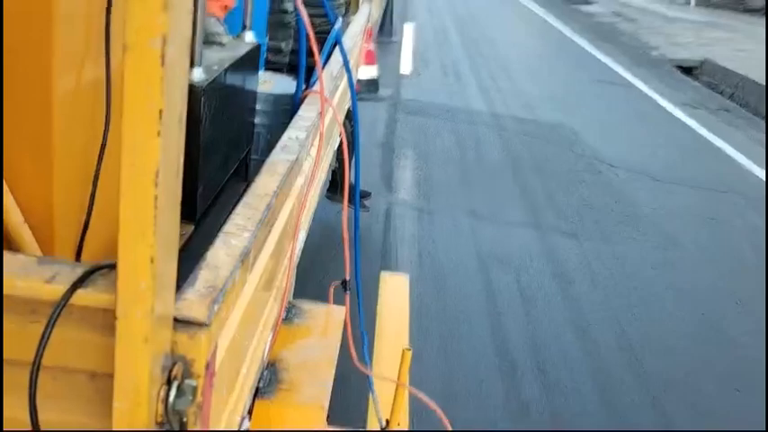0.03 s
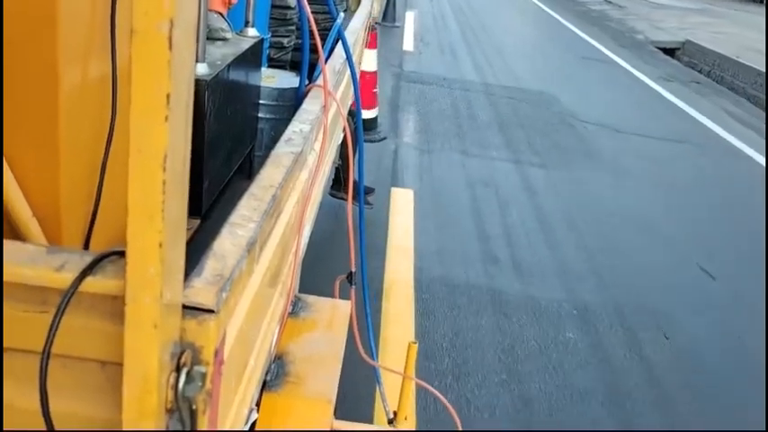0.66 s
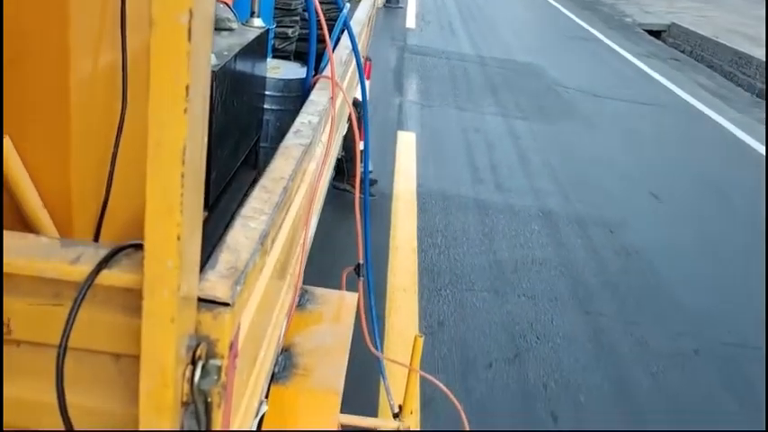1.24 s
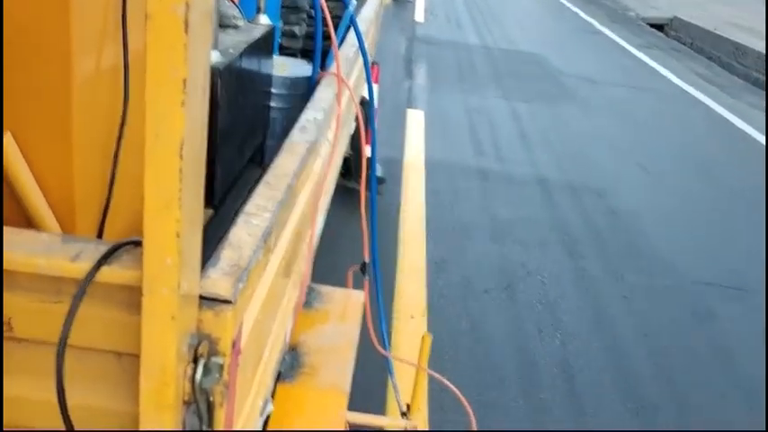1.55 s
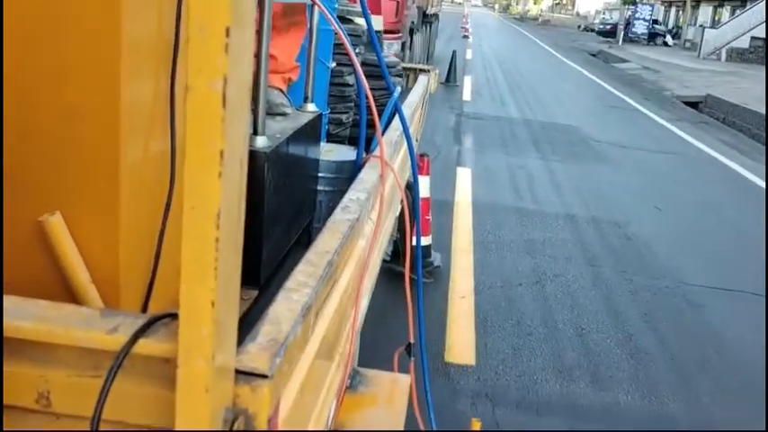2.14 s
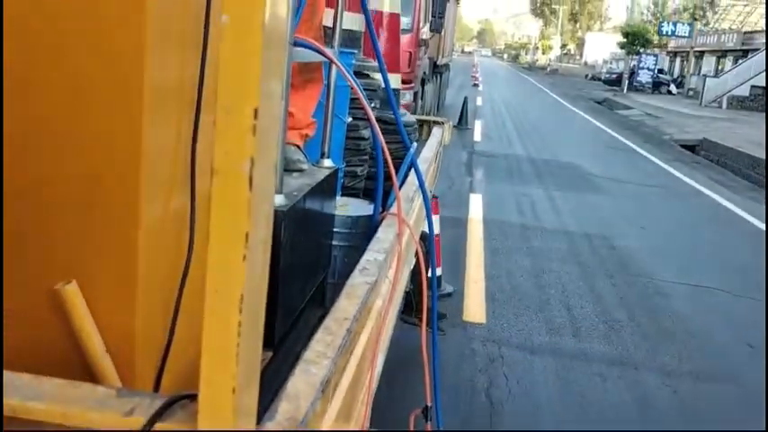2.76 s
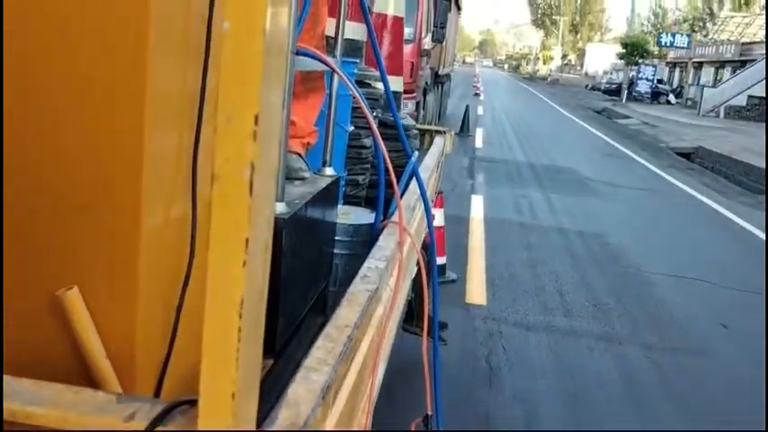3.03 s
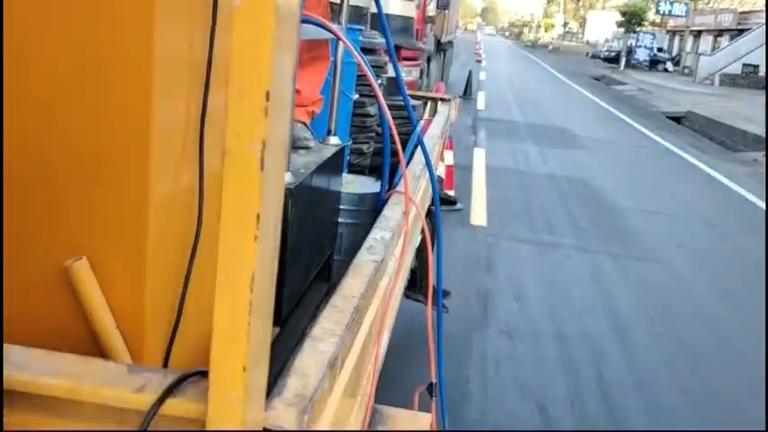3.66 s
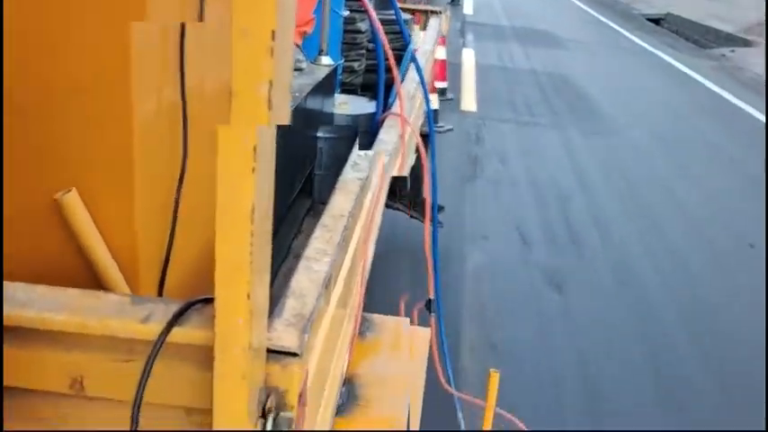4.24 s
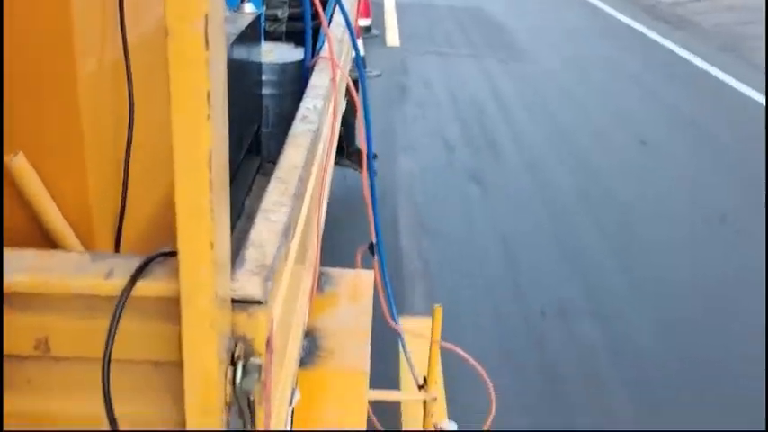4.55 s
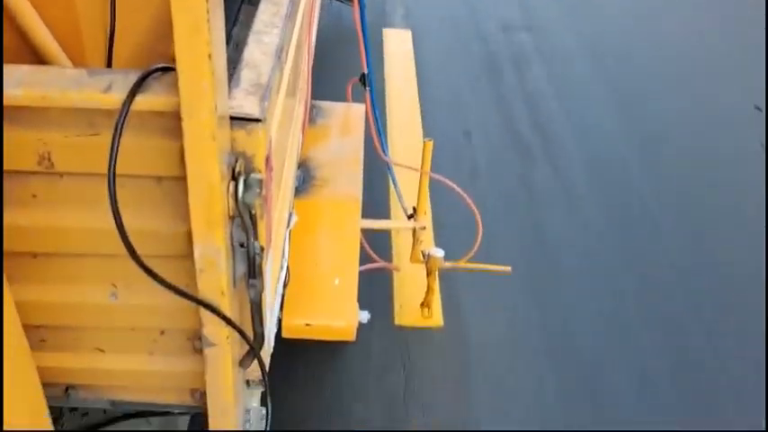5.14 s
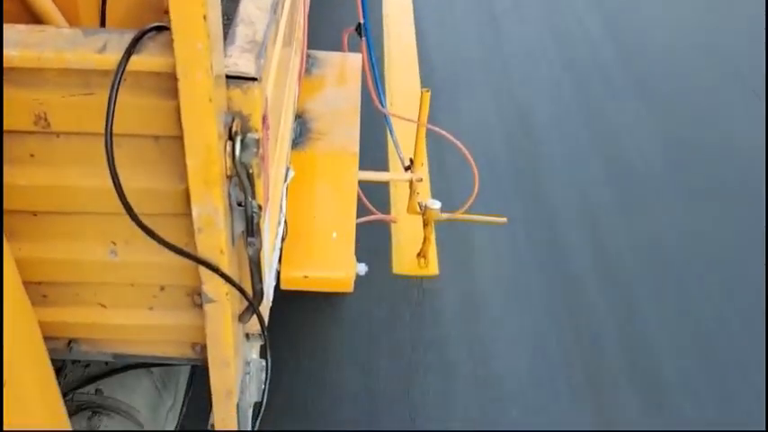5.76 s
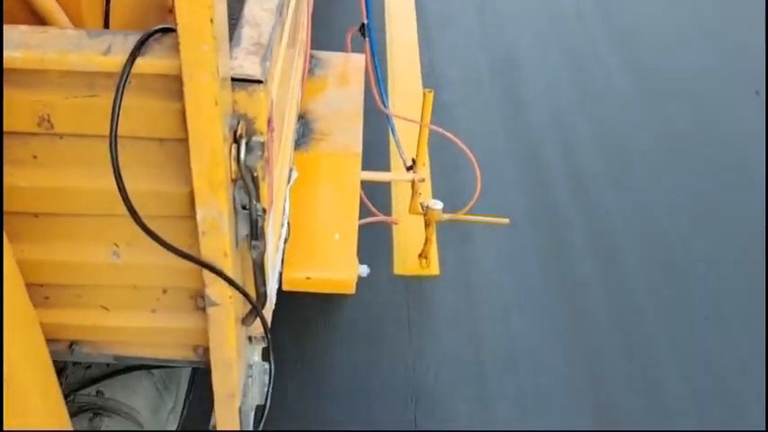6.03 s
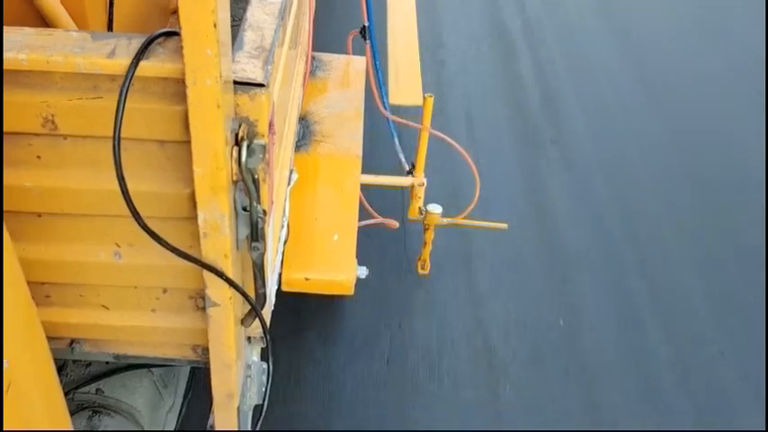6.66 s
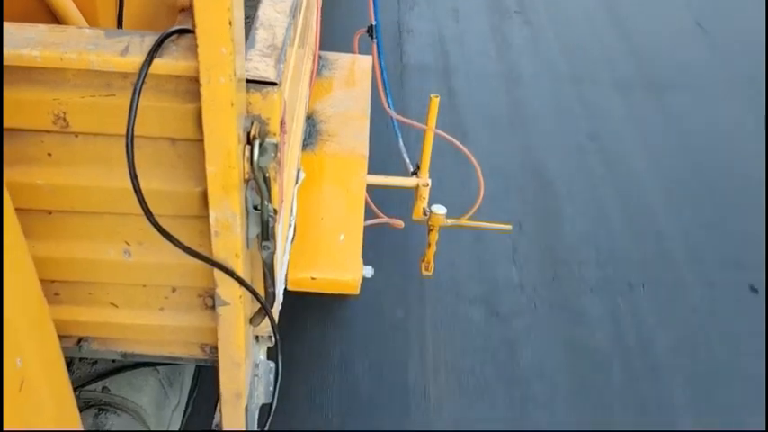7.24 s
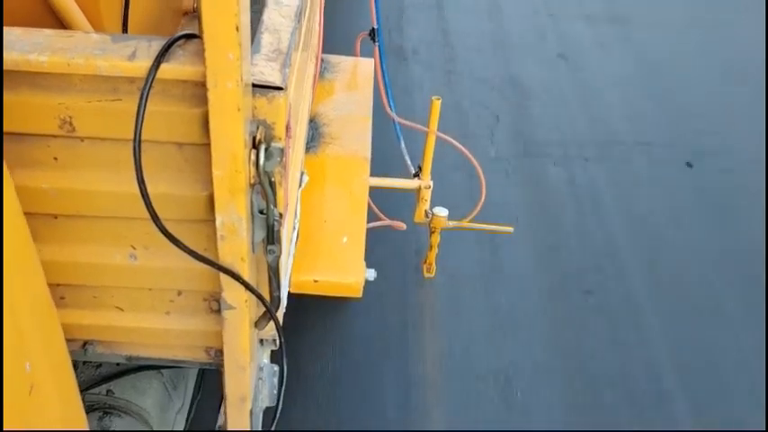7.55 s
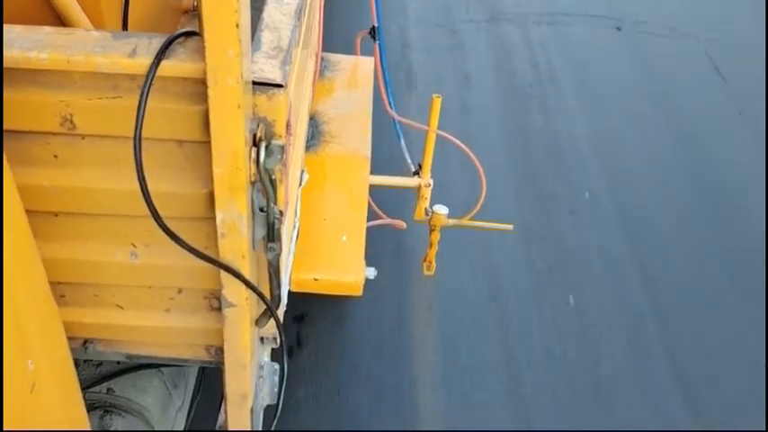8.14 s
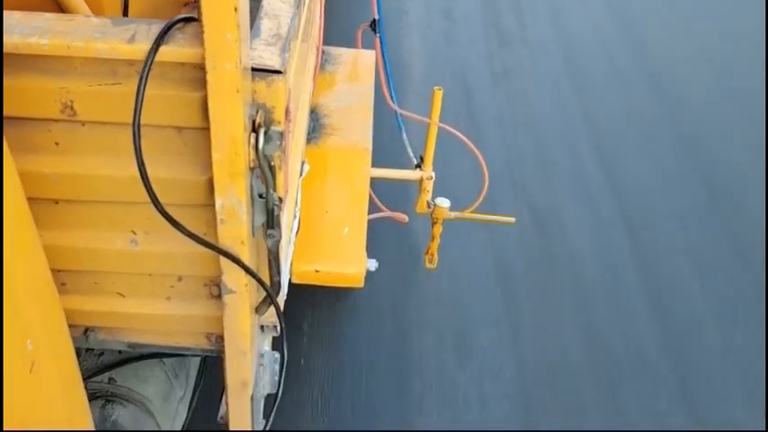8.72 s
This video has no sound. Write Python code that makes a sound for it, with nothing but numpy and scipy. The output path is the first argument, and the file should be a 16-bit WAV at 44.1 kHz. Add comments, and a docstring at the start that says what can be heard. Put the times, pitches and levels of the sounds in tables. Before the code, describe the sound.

Heard from aboard a slow truck painting lines on a road, a compressor's diesel engine chugs close by amid rumbling and rattling panels. A paint nozzle gives a short, sharp hiss, then a thin leak of air remains. With a tiny squeak the nozzle opens for a longer hiss that turns brighter before it cuts off. Occasional thumps shake the deck, and a third hiss starts near the end.

```python
"""A small diesel throbs on the deck of a creeping road-marking truck, driving its compressor.
Each firing sends a puff through the exhaust pipe and silencer, and the valves tick on the metal head,
over the truck's hum, rumble, clatter and jolts. The spray gun's turbulent jet hisses three times, its
paint valve squeaking once; at the end of a stripe the paint stops first and the bare air blows
brighter for a moment. Between stripes a little air keeps leaking."""
import sys
import numpy as np
from scipy import signal
from scipy.fft import rfft, irfft, next_fast_len
from scipy.io import wavfile
from scipy.ndimage import uniform_filter1d

SR = 44100
rng = np.random.default_rng(int(sys.argv[2]) if len(sys.argv) > 2 else 0)


def pcm_store(signal):
    """Save signal as 16-bit PCM."""
    levels = np.round(np.clip(np.atleast_2d(signal), -1, 1) * 32767)
    wavfile.write(sys.argv[1], SR, levels.astype(np.int16).T)


N = 396459
TIME = np.arange(N) / SR


def gain_of(db):
    """Decibels to amplitude ratio."""
    return 10 ** (np.asarray(db) / 20)


def unit_rms(x):
    """Normalisation to unit power."""
    return x / np.sqrt(np.mean(x ** 2) + 1e-20)


def spectrum_at(points, hz):
    """Interpolation of a spectrum on a log-frequency axis."""
    f, value = np.transpose(points)
    return np.interp(np.log(hz + 1), np.log(f + 1), value)


def follow(rows, t=TIME):
    """Linear interpolation of each column of a curve at the times t."""
    times, *columns = np.transpose(rows)
    return [np.interp(t, times, column) for column in columns]


def wander(hz, hop=64):
    """Random modulation: noise of unit rms, low-passed at about hz."""
    steps = next_fast_len(N // hop + 2)
    f = np.fft.rfftfreq(steps, hop / SR)
    slow = irfft(rfft(rng.standard_normal(steps)) / (1 + (f / hz) ** 4), steps)
    return unit_rms(np.interp(TIME, np.arange(steps) * hop / SR, slow))


def resonance_db(peaks, hz):
    """Gain of a set of Lorentzian peaks and dips."""
    return sum(db / (1 + (2 * (hz - centre) / width) ** 2) for centre, width, db in peaks)


def resonate(x, spectrum, peaks=(), size=16384):
    """Forced response of a minimum-phase body to x, scaled to unit rms."""
    hz = abs(np.fft.fftfreq(size, 1 / SR))
    log_gain = np.log(gain_of(spectrum_at(spectrum, hz) + resonance_db(peaks, hz)))
    impulse_response = np.fft.ifft(np.exp(np.conj(signal.hilbert(log_gain)))).real[:size // 2]
    return unit_rms(signal.oaconvolve(x, impulse_response)[:N])


def grains(per_s, spread_db):
    """Shot noise: sparse clicks of uneven size."""
    size = gain_of(spread_db * np.minimum(rng.exponential(1, N), 4))
    return unit_rms(size * rng.standard_normal(N) * (rng.random(N) < per_s / SR))


def pulse(cycles, decay):
    """Exponential decay, restarted each cycle; decay is a share of the cycle."""
    return unit_rms(np.exp(-(cycles % 1) / decay))


def near_wheel():
    """Proximity: the listener leans out from the deck toward the rear wheel and back."""
    # listening position: (time [s], nearness [0-1])
    lean = [(1.8, 0.25), (3.2, 0.81), (4.2, 0.63), (4.7, 1), (6.8, 0.96), (8.2, 0.67)]
    return np.clip(follow(lean)[0], 0, 1)


def firing_cycles(first=.436):
    """Engine phase in cycles: a four-stroke cylinder fires once in two revolutions."""
    # compressor engine: (time [s], speed [rpm])
    speed = [(0.0, 1842), (0.6, 1833), (1.3, 1872), (1.8, 1837), (2.6, 1840), (3.5, 1824), (4.2, 1848),
             (4.7, 1838), (6.3, 1837), (7.3, 1833), (9.0, 1848)]
    rpm, = follow(speed)
    return np.cumsum(rpm / 120) / SR - first


def exhaust(cycles, echo_s=.0376, direct=0.88, uneven_db=1.2):
    """Pulse excitation: one puff a firing reflects to and fro in the pipe and rings the silencer."""
    # firings that thump harder: (time [s], boost [dB])
    hard_firings = [(0.355, 2), (2.172, 3), (2.765, 5), (3.738, 3.5), (4.13, 3.5), (4.375, 4), (4.522, 4),
                    (4.587, 3.5), (4.715, 2), (4.848, 2.5), (4.912, 2.5), (5.895, 5), (6.742, 4),
                    (6.808, 4), (7.068, 3)]
    # silencer response: (frequency [x mean firing rate], gain on deck [dB], gain leaning out [dB])
    silencer = [(2, -55, -58), (3, -48, -45.5), (4, -39, -45), (4.88, -55, -50), (5.92, -34.5, -32.5),
                (7.1, -29, -32), (8.12, -26, -26), (9.1, -26, -35.5), (10, -44, -35.5), (11.1, -41, -44),
                (11.98, -43, -36), (12.87, -44, -54.5), (13.6, -50, -50), (15, -57, -51), (16, -39.5, -47),
                (17.3, -48.5, -44.5), (17.8, -51, -50), (19, -52, -53), (20, -46.5, -44), (21, -51, -43.5),
                (21.75, -45.5, -44), (23.7, -58, -54)]
    # exhaust throb: (time [s], level [dB])
    throb = [(0.4, -21), (1.05, -26), (1.3, -18.5), (1.85, -23.5), (2.25, -21), (2.7, -23), (3.6, -22.5),
             (7.5, -25.5), (9.0, -24)]
    hard_db = sum(db * (abs(TIME - s) < .032) for s, db in hard_firings)
    puffs = np.diff(np.floor(cycles), prepend=-1) * gain_of(uneven_db * wander(4.4) + hard_db)
    # all-pass: round trips spread each puff in time without colouring it
    round_trip = np.exp(-2j * np.pi * np.fft.rfftfreq(N, 1 / SR) * echo_s)
    puffs = irfft(rfft(puffs) * (round_trip + direct) / (1 + direct * round_trip), N)
    firing_hz = (cycles[-1] - cycles[0]) / TIME[-1]
    multiples, *positions = np.transpose(silencer)
    spectra = [[(8, -80), *zip(multiples * firing_hz, db), (900, -90), (3000, -125)] for db in positions]
    on_deck, leaning = (resonate(puffs, spectrum) for spectrum in spectra)
    near = near_wheel()
    return ((1 - near) * on_deck + near * leaning) * gain_of(follow(throb)[0])


def valves(cycles, level_db=-35.0, wheel_db=-6.0, play_cycles=0.0012, uneven_db=2.0, chatter_s=0.004):
    """Impact excitation: valves and piston knock, chatter and ring the modes of the metal head."""
    # knocks in every cycle: (phase after firing [cycles], relative level [dB])
    knocks = [(-0.24, -2.5), (-0.09, -4), (-0.03, 0), (0.125, -1.5), (0.195, -4), (0.3, -2), (0.43, -8),
              (0.53, -7)]
    # the compressor's head: (frequency [Hz], gain [dB])
    head = [(500, -30), (1450, -16.5), (1750, 1), (2150, -3), (2400, -9.5), (3500, -16), (5200, -57)]
    # its modes: (frequency [Hz], width [Hz], gain [dB])
    head_modes = [(1762, 55, 10), (1895, 35, 10), (2025, 30, 12), (2095, 25, 11), (2150, 25, 10)]
    near, ticks, firings = near_wheel(), np.zeros(N), np.arange(cycles[-1])
    # toward the wheel the knocks even out and ring less
    for phase, db in knocks:
        late, strong = rng.standard_normal((len(firings), 2)).T
        at = np.minimum(np.searchsorted(cycles, firings + phase + play_cycles * late), N - 1)
        ticks[at] += gain_of(db * (1 - .6 * near[at]) + uneven_db * strong)
    tails = signal.lfilter([1], [1, -np.exp(-1 / (chatter_s * SR))], ticks)
    chatter = tails * rng.standard_normal(N)
    drive = unit_rms(ticks) + unit_rms(chatter) / 2
    ringing = resonate(drive, head, head_modes)
    plain = gain_of(-2) * resonate(drive, head)
    return ((1 - near / 2) * ringing + near / 2 * plain) * gain_of(level_db + wheel_db * near)


def hum(pitch_waver=0.0021, waver_db=2.0):
    """Periodic vibration: the truck's engine and drive train hold a few nearly steady tones."""
    # partials: (frequency [Hz], rms level [dB])
    partials = [(35, -46), (53.5, -43), (214, -47), (267.6, -40), (337, -47)]
    clock = TIME + np.cumsum(pitch_waver * wander(1.52)) / SR
    out = np.zeros(N)
    for hz, db in partials:
        amplitude = np.sqrt(2) * gain_of(db + waver_db * wander(2.1))
        out += amplitude * np.sin(2 * np.pi * (hz * clock + rng.random()))
    return out


def rumble(cycles, level_db=-29.5, wheel_db=5.5, shake=0.45, lumpy_db=1.0):
    """Forced vibration: road and engine shake the frame, hardest at each stroke."""
    # boom of frame and tyres: (frequency [Hz], gain [dB])
    frame = [(15, -27), (32, -13), (55, -5), (78, -1.5), (102, -2.5), (135, -1), (175, 0.9), (210, -5),
             (267, -2.5), (298, -7), (326, -2.5), (365, -13.5), (480, -23), (900, -56)]
    surge = 1 + shake * pulse(cycles, 0.43)
    drive = rng.standard_normal(N) * surge * gain_of(lumpy_db * wander(14.5))
    return resonate(drive, frame) * gain_of(level_db + wheel_db * near_wheel())


def clatter(cycles, level_db=-32.0, wheel_db=3.5, truck_hz=26.65, rattle=0.29, flutter_db=1.42):
    """Panel resonance: both engines knock in their casings and loose fittings rattle."""
    # casings and panels: (frequency [Hz], gain [dB])
    casings = [(200, -12), (400, -5), (540, -1), (780, -0.5), (900, -4.5), (1500, -6.5), (1820, -1.5),
               (2120, -5.5), (2350, -9.5), (3700, -17), (4550, -19.5), (5400, -57), (8000, -36),
               (12000, -55)]
    # sheet-metal modes: (frequency [Hz], width [Hz], gain [dB])
    panel_modes = [(412.5, 27, 6.5), (660, 28, 3), (735, 18, 7), (770, 30, 4), (830, 26, 6), (1020, 55, 4),
                   (2450, 90, 3), (2723, 86, 4.5), (4550, 550, 6)]
    near = near_wheel()
    truck_cycles = truck_hz * TIME + 0.059 * wander(1.8)
    compressor_knock = 0.18 * (1 - near / 2) * pulse(cycles, 0.5)
    truck_knock = 0.24 * near * pulse(truck_cycles, 0.31)
    noise = rng.standard_normal(N) + rattle * grains(600, 0.77)
    drive = noise * (1 + compressor_knock + truck_knock) * gain_of(flutter_db * wander(20.7))
    return resonate(drive, casings, panel_modes) * gain_of(level_db + wheel_db * near)


def leak(cycles, pulsing=0.1, waver_db=0.9):
    """Turbulence: air escaping at the fittings hisses thinly and pulses with the compressor."""
    # hiss spectrum: (frequency [Hz], gain [dB])
    hiss = [(1500, -6.5), (3000, 1.5), (4400, 11), (4900, 9.5), (5300, 0), (6200, 3), (7100, -5),
            (8000, -7.5), (10000, -19), (12000, -14.5)]
    # strength of the leak: (time [s], level [dB])
    level = [(1.3, -36.5), (3.6, -39), (5.9, -49), (6.1, -45)]
    drive = rng.standard_normal(N) * (1 + pulsing * pulse(cycles, 0.17))
    return resonate(drive, hiss) * gain_of(follow(level)[0] + waver_db * wander(15))


def gun_flow(t, open_s, dry_s, clear_s, shut_s, paint_db, air_db, paint_share):
    """Valve-controlled flow: pressure sags, paint stops, the air line empties. Gives gain and paint."""
    opening_s, sag_db_per_s, emptying_db_per_s = 0.064, 2, 130
    flowing = 1 - np.clip((t - dry_s) / clear_s, 0, 1)
    level_db = flowing * (paint_db - sag_db_per_s * (t - open_s)) + (1 - flowing) * air_db
    valve = np.clip((t - open_s) / opening_s, 0, 1)
    emptying = gain_of(-emptying_db_per_s * np.maximum(t - shut_s, 0))
    return valve * emptying * gain_of(level_db), flowing * np.clip(paint_share, 0, 1)


def patches(shape):
    """Smoothed time-frequency noise of unit rms, in patches some 400 Hz wide and 40 ms long."""
    field = uniform_filter1d(rng.standard_normal(shape), size=5, axis=0)
    return unit_rms(uniform_filter1d(field, size=14, axis=1))


def spray(cycles, wet_ring_hz=4830, dry_ring_hz=5000, ring_width_hz=880, dip_width_hz=420):
    """Turbulent jet noise with droplets; paint in the jet lowers the nozzle's broad resonance."""
    # pulls of the gun: (air opens [s], paint stops [s], clearing time [s], air shuts [s],
    # spraying gain [dB], bare-air gain [dB], paint share [0-1], nozzle resonance [dB])
    bursts = [(0.17, 0.775, .13, 1.115, -31.5, -26, 1, 11.5),
              (3.78, 5.701, 0.0069, 5.93, -36, -29.5, 1, 7.5), (8.66, 10, .018, 10.3, -34, -35, 0.28, 2)]
    # hiss with paint in the jet, and of air alone: (frequency [Hz], gain [dB])
    paint_hiss = [(800, -22), (2000, 4.5), (3400, 8.5), (4200, 6), (5200, 6.5), (6500, 8), (8700, 8.5),
                  (9400, 6), (10350, 2), (11100, 4), (12000, 5)]
    air_hiss = [(800, -27.5), (2000, -0.5), (3100, 4), (4100, 2), (5400, 0), (6500, 4), (8700, 5.5),
                (9500, 3), (10700, 5), (12000, 4)]
    # the nozzle rings louder on opening and as the last gobs blow out: (time [s], boost [dB], width [s])
    surges = [(0.26, 4, 0.06), (0.75, 2, 0.012), (0.82, 2, 0.014), (0.875, 4, 0.018), (1.052, 3.5, 0.018),
              (1.158, 5, 0.014), (1.2, 5, 0.012), (3.89, 2.5, 0.1), (5.722, 3.5, 0.02), (5.83, 1.5, 0.07),
              (8.76, 2, 0.1)]
    # a drifting dip near 10 kHz that dulls the top of the hiss: (time [s], frequency [Hz], gain [dB])
    treble_dip = [(0.4, 10650, -18), (0.9, 10100, -2.5), (3.9, 9850, -25), (4.35, 10300, -22),
                  (4.55, 10410, -0.5), (4.85, 10300, -24), (5.3, 10560, -29), (5.67, 10500, -22),
                  (5.74, 10220, -12), (8.8, 10000, -23)]
    # dips and peaks at the listening spot: (frequency [Hz], width [Hz], gain [dB])
    jet_colour = [(3270, 320, -2.5), (4230, 150, 1.5), (7140, 160, -19), (8040, 100, -11)]
    # patchy sizzle: (frequency [Hz], rms depth [dB])
    sizzle = [(3000, 1.6), (8000, 2), (11000, 3.2)]
    spatter, pulsing, sway, sputter_depth_db = 0.41, 0.18, 0.0054, 1.5
    noise = rng.standard_normal(N) + spatter * grains(1500, 1.5)
    drive = noise * (1 + pulsing * pulse(cycles, 0.46))
    hz, t, frames = signal.stft(unit_rms(drive), SR, nperseg=512, noverlap=384)
    surge_db = sum(db * np.exp(-((t - s) / width) ** 2) for s, db, width in surges)
    sputter_db = sputter_depth_db * np.interp(t, TIME, wander(70))  # roughens the ring as paint clears
    swayed_hz = np.outer(hz, 1 + sway * np.interp(t, TIME, wander(3)))  # dips drift as the boom sways
    dip_hz, depth_db = follow(treble_dip, t)
    dip_db = depth_db * np.exp(-((swayed_hz - dip_hz) / dip_width_hz) ** 2 / 2)
    jet = 0
    for *pull, ring_db in bursts:
        gain, paint = gun_flow(t, *pull)
        ring_hz = dry_ring_hz + (wet_ring_hz - dry_ring_hz) * paint
        ring_shape = np.exp(-((hz[:, None] - ring_hz) / ring_width_hz) ** 2 / 2)
        nozzle_db = ring_shape * (ring_db + surge_db + sputter_db * (1 - paint))
        wet_db = np.outer(spectrum_at(paint_hiss, hz), paint)
        dry_db = np.outer(spectrum_at(air_hiss, hz), 1 - paint)
        jet = jet + gain * gain_of(wet_db + dry_db + nozzle_db)
    sizzle_db = spectrum_at(sizzle, hz)[:, None] * patches(frames.shape)
    frames = frames * jet * gain_of(dip_db + resonance_db(jet_colour, swayed_hz) + sizzle_db)
    return signal.istft(frames, SR, nperseg=512, noverlap=384)[1][:N]


def jolts(rise_s=0.0012):
    """Free vibration: sharp blows set the deck's damped modes ringing."""
    # blows: (time [s], peak level [dB])
    blows = [(0.379, -17), (2.752, -13), (4.043, -17), (4.399, -14), (4.901, -15), (4.945, -16),
             (6.502, -18)]
    # deck modes: (frequency [Hz], relative level [dB], 60 dB decay time [s])
    deck_modes = [(138, -3, 0.06), (270, 4, 0.07), (327, -4, 0.05), (730, -8, 0.044)]
    out = np.zeros(N)
    for s, peak_db in blows:
        start = round(s * SR)
        t = np.maximum(TIME[start:start + SR // 4] - s, 0)
        ring = sum(gain_of(db - 60 * t / t60) * np.sin(2 * np.pi * hz * t) for hz, db, t60 in deck_modes)
        ring *= 1 - np.exp(-t / rise_s)
        out[start:start + len(t)] += gain_of(peak_db) * ring / abs(ring).max()
    return out


def squeak(waver_hz=22, boost_db=4.5):
    """Random frequency modulation: the paint valve gives a short unsteady note as it opens."""
    # the note: (time [s], length [s], frequency [Hz], level before boost [dB])
    note = (3.758, .085, 1795, -31)
    start_s, length_s, hz, db = note
    swell = np.sin(np.pi * np.clip((TIME - start_s) / length_s, 0, 1))
    phase = 2 * np.pi * np.cumsum(hz + waver_hz * wander(63.0)) / SR
    return gain_of(db + boost_db) * swell * np.sin(phase)


def scene(lead_cycles=.12):
    """Superposition of everything on the truck, in one channel."""
    cycles = firing_cycles()
    strokes = cycles + lead_cycles  # frame and air line feel a stroke before its exhaust leaves the pipe
    machine = exhaust(cycles) + valves(cycles) + hum() + rumble(strokes) + clatter(strokes) + jolts()
    return (machine + leak(strokes) + spray(strokes) + squeak())[None]


def record(dry, start_s=0.245, opening_gain=0.41, settle_s=0.086, cutoff_hz=12040):
    """Gating and band limiting: after a short silence the sound swells to full level, low-passed."""
    gate = gain_of(np.clip((TIME - start_s) * 3500, -200, 0))
    swell = 1 - (1 - opening_gain) * np.exp(-np.maximum(TIME - start_s, 0) / settle_s)
    low_pass = signal.firwin(1023, cutoff_hz, window=("kaiser", 9), fs=SR)
    return signal.oaconvolve(dry * gate * swell, low_pass[None], "same")


dry = scene()
out = record(dry)
pcm_store(out)
```